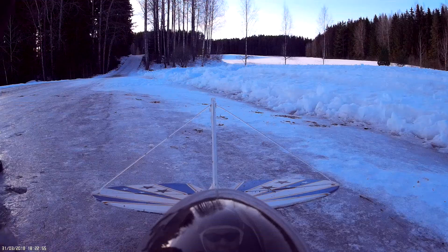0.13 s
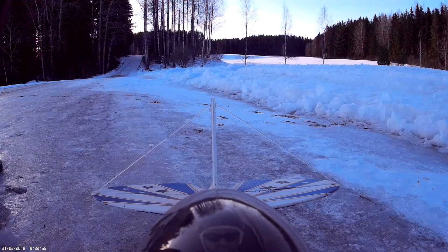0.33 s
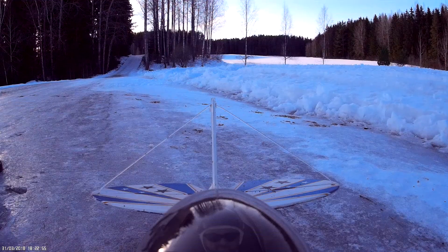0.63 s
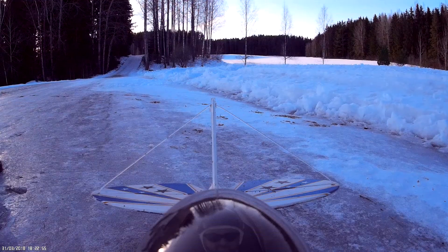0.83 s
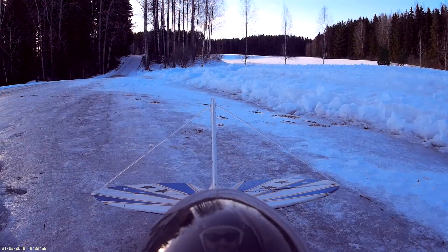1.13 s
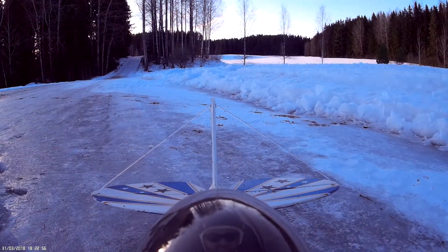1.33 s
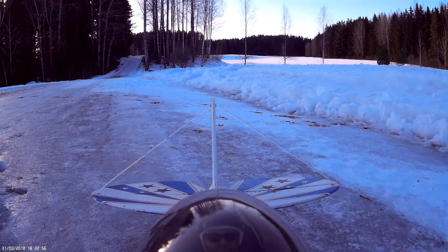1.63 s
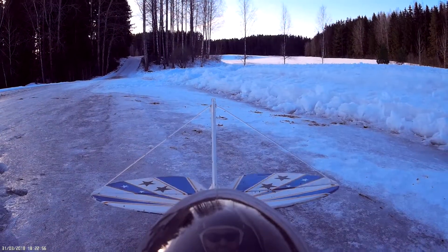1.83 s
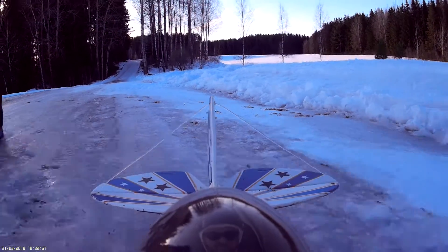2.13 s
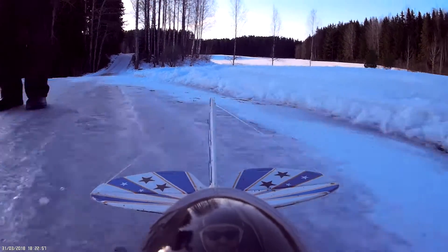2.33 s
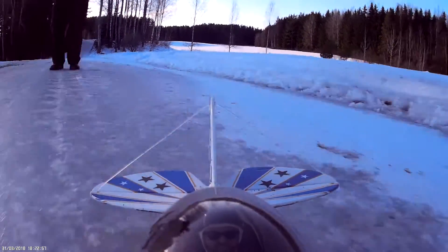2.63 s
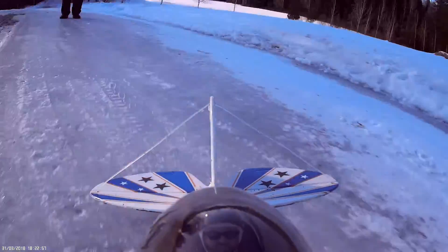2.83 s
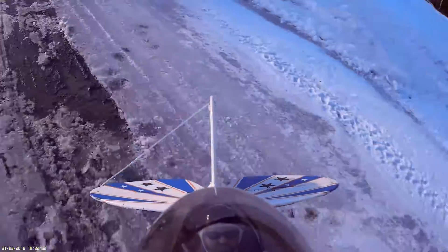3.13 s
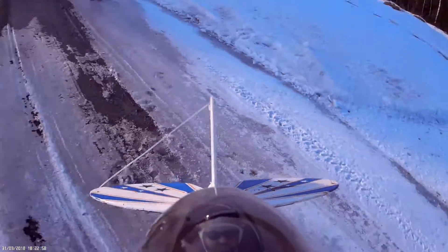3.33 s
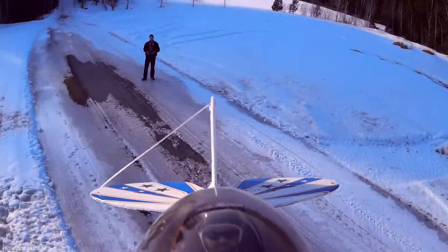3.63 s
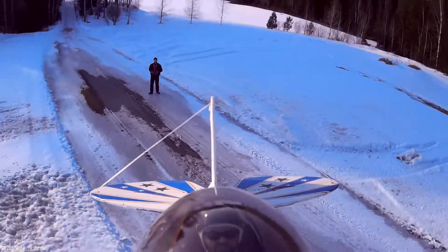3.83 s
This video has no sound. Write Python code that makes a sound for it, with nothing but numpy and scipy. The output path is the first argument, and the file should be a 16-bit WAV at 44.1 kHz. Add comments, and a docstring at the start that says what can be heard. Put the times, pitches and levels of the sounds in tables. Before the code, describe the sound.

A model plane's electric motor stutters, whines, then roars into take-off with buffeting wind.

```python
"""A few light ticks, very close: the microphone is in a camera on a model plane's fuselage, on an icy road.
The electric motor scratches, stutters into motion and idles, whining and rattling through the airframe.
At two seconds the throttle opens for take-off: shaft and propeller drone, the undercarriage scrapes the
ice, and the propeller's wash buffets the microphone and overloads it. Last comes the slipstream's whistle."""
import sys
import numpy as np
from scipy.fft import rfft, irfft, next_fast_len
from scipy.io import wavfile
from scipy.ndimage import uniform_filter1d, map_coordinates

SR = 44100
rng = np.random.default_rng(int(sys.argv[2]) if len(sys.argv) > 2 else 0)


def pcm_store(signal):
    """Save signal as 16-bit PCM."""
    levels = np.round(np.clip(np.atleast_2d(signal), -1, 1) * 32767)
    wavfile.write(sys.argv[1], SR, levels.astype(np.int16).T)


N = 176400
T = np.arange(N) / SR

# Shaft speed, idle to full throttle: time_s, turns_per_s
SHAFT_SPEED = [(1.19, 14), (1.3, 19.4), (1.38, 23.8), (1.49, 29.2), (1.63, 30.2), (1.7, 32.3), (1.8, 34.8),
               (1.86, 35.7), (1.9, 38.4), (1.95, 45.2), (2.0, 59.5), (2.05, 79), (2.1, 100), (2.15, 116),
               (2.2, 124), (2.27, 129.7), (2.95, 129.6), (4.0, 131.7)]
# Drone at the camera: time_s, shake_db, blade_db
DRONE_LEVELS = [(1.4, -92, -97), (1.55, -33.5, -36), (1.94, -46, -32.5), (2.02, -14.5, -20.5),
                (2.07, -17.5, -9), (2.105, -1, -13.5), (2.18, -2.5, -8.5), (2.24, -12.5, -17),
                (2.37, -5.5, -9.5), (2.47, -8, -17), (2.66, -7.5, -19.5), (2.75, -8.5, -12.5),
                (2.86, -13.5, -12.5), (2.94, -10, -13.5), (3.12, -11, -10.5), (3.3, -18.5, -17.5),
                (3.48, -12, -14.5), (3.85, -12, -14.5), (4.0, -17, -17)]
# Propeller overtones: shaft_multiple, gain_db
BUZZ_PARTIALS = [(3, -26), (4, -25.5), (5, -29.5), (6, -29.5), (7, -37.5), (8, -41)]
# Swell of those overtones: time_s, gain_db
BUZZ_GAIN = [(1.9, -40), (2.0, -9), (2.13, 4), (2.3, -3.5), (2.48, 2), (2.66, -7), (3.08, 3.5), (3.5, -4),
             (4.0, -5)]
# Wash on the microphone: time_s, rush_db, hiss_db
WASH_LEVELS = [(1.18, -127, -124), (1.25, -44, -65), (1.42, -38, -55), (1.46, -38.5, -52),
               (1.7, -36.5, -49.5), (1.93, -31, -37.5), (2.0, -31, -34), (2.06, -12.5, -27),
               (2.11, -22, -39.5), (2.24, -16.5, -31.5), (2.47, -17, -31), (2.65, -22, -30.5),
               (3.0, -18, -32.5), (3.28, -23, -32.5), (3.6, -19, -30.5), (4.0, -21.5, -32)]
# Low buffeting under it: time_s, level_db
BUFFET_LEVEL = [(1.17, -95), (1.25, -56), (1.42, -52), (1.46, -33), (1.7, -29), (1.93, -28), (2.06, -17),
                (2.13, -19), (2.25, -16), (3.0, -17), (4.0, -17)]
# Air past the fuselage in flight: time_s, level_db
SLIPSTREAM_LEVEL = [(2.0, -100), (3.2, -57), (3.45, -29), (3.65, -28)]
# Spectra of the moving air: frequency_hz, gain_db
BUFFET_SPECTRUM = [(15, -21), (35, -7), (70, 3.5), (170, -1), (300, -5.5), (500, -14), (1000, -50),
                   (3000, -75)]
RUSH_SPECTRUM = [(100, -3), (350, 1), (600, 3.5), (900, -5), (1300, -6), (1750, -6.5), (2300, -16),
                 (3500, -17.5), (8000, -49)]
HISS_SPECTRUM = [(800, -41), (2200, 4.5), (3500, -5.5), (5200, -0.5), (6100, -7), (7200, -5.5), (8800, -9),
                 (10800, -17), (12000, -15), (14000, -22.5), (15700, -28)]
SLIPSTREAM_SPECTRUM = [(600, -15), (1600, 15), (2300, 4), (4100, 10.5), (5300, -11), (6200, -13),
                       (7200, -3), (11000, -53)]
# Magnetic whine: time_s, commutation_db, cogging_db
WHINE_LEVELS = [(1.19, -93, -85), (1.232, -14.5, -5), (1.31, -18, -18), (1.38, -14.5, -35),
                (1.44, -22, -22.5), (1.54, -27.5, -25.5), (1.7, -19, -26.5), (1.83, -29, -27.5),
                (1.939, -11, -28), (1.99, -17.5, -30), (2.08, -37, -55), (2.15, -95, -90)]
# Its two sets of partials: shaft_multiple, gain_db
COMMUTATION_PARTIALS = [(21, 3.5), (42, -0.5), (63, -11), (84, -11)]
COGGING_PARTIALS = [(14, -13.5), (28, 3), (35, -21), (49, -10), (56, -14.5)]
# Its path through the airframe: frequency_hz, gain_db
AIRFRAME_RESPONSE = [(200, 1), (350, -20.5), (600, -25), (870, -1), (1050, -1), (1300, 0), (1600, -3.5),
                     (2400, -10.5), (3800, -27), (4500, -6), (5500, -16), (12000, -40)]
# Rattle of the motor's mount and ring of its metal bell: time_s, level_db
RATTLE_LEVEL = [(1.19, -95), (1.195, -25), (1.215, -27), (1.24, -19.5), (1.3, -18.5), (1.37, -27),
                (1.85, -27.5), (1.98, -20), (2.06, -15.5), (2.11, -26.5)]
BELL_LEVEL = [(1.19, -100), (1.22, -51), (1.33, -46.5), (1.42, -52.5), (1.49, -50), (1.96, -38.5),
              (2.05, -25), (2.11, -49)]
# Resonances of airframe and bell: pitch_hz, width_hz, gain_db
AIRFRAME_RESONANCES = [(340.8, 6.9, 4.5), (483, 26, 1), (866, 205, 2), (1339, 253, 0.5), (1910, 530, -13),
                       (3070, 940, -26), (5280, 450, -36)]
BELL_RESONANCES = [(4357, 65, -6), (4516, 75, 0)]
# Squeals as the motor catches: peak_s, pitch_hz, level_db, swell_s
CATCH_SQUEALS = [(1.486, 1206, -4, 0.0043), (1.493, 896, -12.5, 0.008)]
# Sidebands of the controller's whistle: switching_multiple, shaft_multiple, gain_db
WHISTLE_SIDEBANDS = [(1, 14, -16), (1, 42, -15), (1, 70, -19), (2, -14, -25)]
# Rotor scratching before it turns, and grit under the undercarriage: time_s, level_db
SCRATCH_LEVEL = [(1.04, -100), (1.062, -67), (1.094, -69), (1.097, -53), (1.125, -58), (1.155, -47),
                 (1.187, -59.5)]
GRIT_LEVEL = [(1.8, -100), (2.1, -45), (2.2, -36), (2.35, -47), (2.46, -32), (2.56, -42), (2.95, -42)]
# The motor kicks, the rotor jerks free, the airframe ticks: start_s, strength_db
MOTOR_CLACKS = [(1.1935, -28), (1.2005, -18), (1.4895, -7)]
ROTOR_CRACKS = [(1.2008, -25), (1.2405, -20), (1.2462, -21), (1.26, -21)]
AIRFRAME_TICKS = [(.074, -38.5), (.131, -47), (.335, -54), (.51, -57), (.664, -54), (.787, -54),
                  (.847, -48)]
# Spectra of these contacts and of the noise floor: frequency_hz, gain_db
CLACK_SPECTRUM = [(150, -5), (900, 0), (3200, -7), (7500, -29.5), (15000, -41)]
CRACK_SPECTRUM = [(2500, 2), (7000, -8.5), (15000, -27)]
GRIT_SPECTRUM = [(1500, 14), (8000, 10.5), (15500, -8)]
TICK_SPECTRUM = [(60, -10), (650, 2), (1650, -4), (2300, -22), (3300, -19), (15000, -50)]
FLOOR_SPECTRUM = [(80, 11), (200, 3.5), (600, -5.5), (1400, -3), (2500, -10.5), (15000, -11)]

MOTOR_START_S = SHAFT_SPEED[0][0]


def propeller(angle, flutter_db=2.6, wander_rad=0.27):
    """The unbalanced shaft shakes the camera once a turn; two blades beat twice, with buzzing overtones."""
    shake_db, blade_db = curves(DRONE_LEVELS)
    shake = amp(shake_db + 1.15 * wobble(25.98)) * np.cos(angle)
    blades = amp(blade_db + 0.22 * wobble(24.44)) * np.cos(2 * angle + wander_rad * wobble(6.1))
    buzz = np.zeros(N)
    for multiple, db in BUZZ_PARTIALS:
        gain = amp(db + flutter_db * wobble(6.985))
        buzz += gain * np.cos(multiple * angle + rng.uniform(0, 2 * np.pi) + wander_rad * wobble(30))
    return np.sqrt(2) * (shake + blades + buzz * fader(BUZZ_GAIN) * (T > MOTOR_START_S))


def wash(angle, chop_depth=0.33):
    """Turbulent air from the propeller buffets the microphone; each turn chops its rush and hiss."""
    rush_db, hiss_db = curves(WASH_LEVELS)
    chop = 1 + chop_depth * np.cos(angle)
    swirl_db = wobble(220)
    buffet = fader(BUFFET_LEVEL) * amp(1.2 * wobble(30)) * noise(BUFFET_SPECTRUM)
    rush = amp(rush_db + 1.5 * swirl_db) * noise(RUSH_SPECTRUM)
    hiss = amp(hiss_db + swirl_db) * noise(HISS_SPECTRUM)
    return buffet + chop * (rush + hiss)


def whine(speed, angle, rough_db=3.5, jitter_rad=0.42, stutter_rad=0.7, settle_s=0.051):
    """Magnets pass the coils, unevenly at first; each partial swells as it crosses an airframe resonance."""
    unsteady_rad = jitter_rad + stutter_rad * np.exp(-np.maximum(T - MOTOR_START_S, 0) / settle_s)
    sound = np.zeros(N)
    for level_db, partials in zip(curves(WHINE_LEVELS), (COMMUTATION_PARTIALS, COGGING_PARTIALS)):
        for multiple, db in partials:
            airframe_db = along(AIRFRAME_RESPONSE, multiple * speed)
            gain = amp(level_db + db + airframe_db + rough_db * np.tanh(wobble(90)))
            sound += gain * np.sin(multiple * angle + unsteady_rad * wobble(140))
    return sound


def rattle(angle, pulse_depth=0.15, dull_hz=6000):
    """Dense taps, swelling once a turn and dulled by the soft mount, ring the airframe and motor bell."""
    blows = taps() * (1 + pulse_depth * np.cos(angle))
    blows = filtered(blows, lambda hz: 1 / np.hypot(1, (hz / dull_hz) ** 2))
    airframe = fader(RATTLE_LEVEL) * ringing(blows, AIRFRAME_RESONANCES)
    bell = fader(BELL_LEVEL) * ringing(blows, BELL_RESONANCES)
    return airframe + bell


def start_up():
    """The rotor scratches as it twitches, then kicks into motion with clacks and a few sharp cracks."""
    scratch = fader(SCRATCH_LEVEL) * coloured(taps(), CLACK_SPECTRUM)
    clacks = knocks(MOTOR_CLACKS, CLACK_SPECTRUM, t60_s=0.022)
    cracks = knocks(ROTOR_CRACKS, CRACK_SPECTRUM, t60_s=0.0089)
    return scratch + clacks + cracks


def controller(angle, switching_hz=7795, whistle_db=-55, on_s=1.47, off_s=2.07):
    """A squeal as the motor locks in, and a thin switching whistle; the turning magnets add sidebands."""
    squeal = sum(amp(db) * np.exp(-((T - peak_s) / swell_s) ** 2) * np.sin(2 * np.pi * hz * T)
                 for peak_s, hz, db, swell_s in CATCH_SQUEALS)
    gate = uniform_filter1d(1. * ((T > on_s) & (T < off_s)), size=200)
    phase = 2 * np.pi * switching_hz * T
    sidebands = sum(amp(db) * np.sin(m * phase + k * angle) for m, k, db in WHISTLE_SIDEBANDS)
    whistle = amp(whistle_db + wobble(20)) * np.sqrt(2) * (np.sin(phase) + sidebands)
    return squeal + gate * whistle


def slipstream():
    """Air whistles past the fuselage once the plane is airborne."""
    return fader(SLIPSTREAM_LEVEL) * amp(wobble(10.08)) * noise(SLIPSTREAM_SPECTRUM)


def grit(clump_db=4):
    """The undercarriage scrapes rough ice in two surges; a faint crackle stays to the end."""
    grains = taps(per_s=2500, scatter_db=7) * amp(clump_db * np.tanh(wobble(200)))
    return fader(GRIT_LEVEL) * coloured(grains, GRIT_SPECTRUM)


def background(floor_db=-67.5):
    """The standing airframe ticks lightly over a faint, steady noise floor."""
    return knocks(AIRFRAME_TICKS, TICK_SPECTRUM, t60_s=0.035) + amp(floor_db) * noise(FLOOR_SPECTRUM)


def knocks(rows, spectrum, t60_s):
    """Fast-dying noise bursts, dulled by the airframe."""
    envelope = sum((T >= s) * amp(db - 60 * np.clip((T - s) / t60_s, 0, 2)) for s, db in rows)
    return filtered(envelope * rng.standard_normal(N), lambda hz: unit(amp(along(spectrum, hz)))) / 2


def taps(per_s=2000, scatter_db=3):
    """Impulses at random times and of uneven size."""
    impulses = (rng.random(N) < per_s / SR) * np.sign(rng.standard_normal(N))
    return impulses * amp(scatter_db * np.tanh(rng.standard_normal(N)))


def ringing(x, modes):
    """x through resonances of alternating polarity, at rms 1."""
    def response(hz):
        return sum((-1) ** k * amp(db) * 1j * hz * width / (pitch ** 2 - hz ** 2 + 1j * hz * width)
                   for k, (pitch, width, db) in enumerate(modes))
    return unit(filtered(x, response))


def noise(spectrum):
    """Coloured noise at rms 1."""
    return coloured(rng.standard_normal(N), spectrum)


def coloured(x, spectrum):
    """x shaped by a spectrum, at rms 1."""
    return unit(filtered(x, lambda hz: amp(along(spectrum, hz))))


def filtered(x, response):
    """x through a complex frequency response."""
    size = next_fast_len(N + SR // 2)
    return irfft(rfft(x, size) * response(np.fft.rfftfreq(size, 1 / SR)), size)[:N]


def wobble(rate):
    """A smooth random curve, rate knots a second."""
    return map_coordinates(rng.standard_normal(int(N * rate / SR) + 4), [T * rate])


def curves(rows):
    """One value per sample for each column after the time."""
    time_s, *columns = np.transpose(rows)
    return [np.interp(T, time_s, column) for column in columns]


def fader(rows):
    """Gain per sample from time_s, level_db rows."""
    return amp(curves(rows)[0])


def along(spectrum, hz):
    """A spectrum's decibels at hz, on a log frequency axis."""
    frequency_hz, gain_db = np.transpose(spectrum)
    return np.interp(np.log(hz + 1), np.log(frequency_hz + 1), gain_db)


def amp(db):
    """Decibels to gain."""
    return 10 ** (np.asarray(db) / 20)


def unit(x):
    """Scale to rms 1."""
    return x / np.sqrt(np.mean(x ** 2) + 1e-20)


def scene():
    """Mono, from the fuselage: one shaft sets the pitch of whine and drone and the chop of the wash."""
    speed, = curves(SHAFT_SPEED)
    angle = 2 * np.pi * np.cumsum(speed) / SR
    motor = whine(speed, angle) + rattle(angle) + controller(angle) + start_up()
    return (motor + background() + propeller(angle) + grit() + wash(angle) + slipstream())[None]


def record(dry):
    """The small camera's microphone overloads, flattening the peaks, and passes only its own band."""
    ceiling, hardness = 0.7, 12.3
    low_hz, top_hz = 12, 15750
    flattened = dry[0] / (1 + np.abs(dry[0] / ceiling) ** hardness) ** (1 / hardness)
    return filtered(flattened, lambda hz: (hz < top_hz) * hz ** 2 / (hz ** 2 + low_hz ** 2))[None]


dry = scene()
out = record(dry)
pcm_store(out)
```